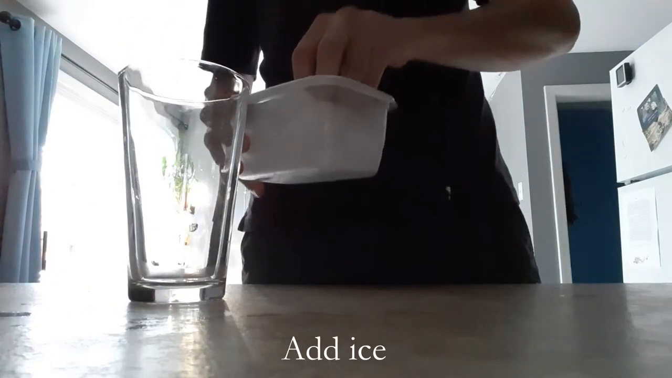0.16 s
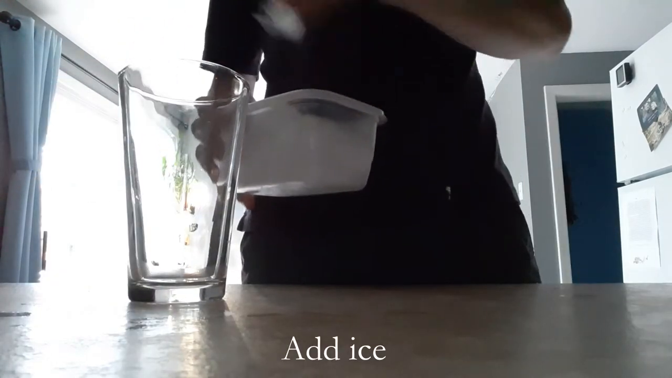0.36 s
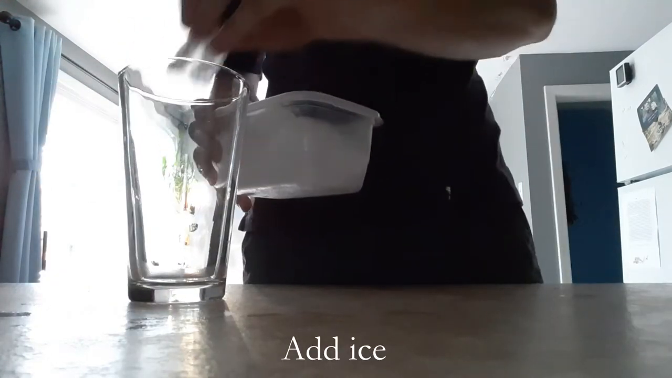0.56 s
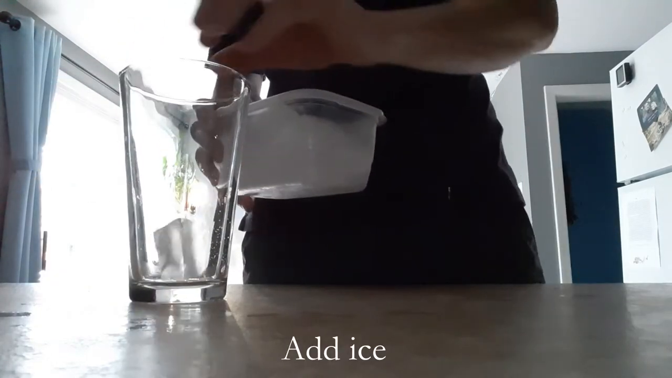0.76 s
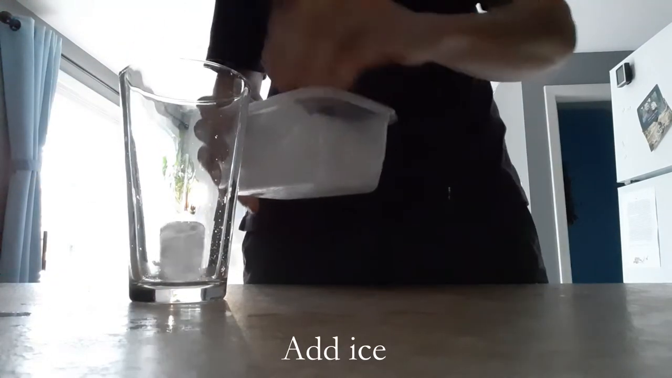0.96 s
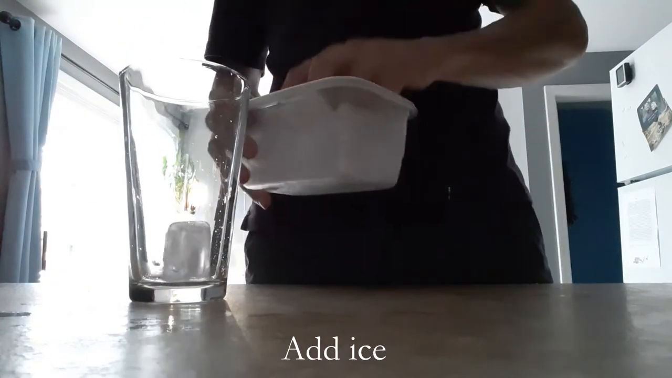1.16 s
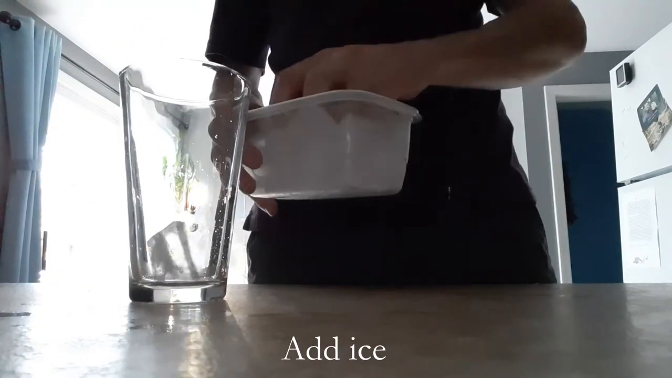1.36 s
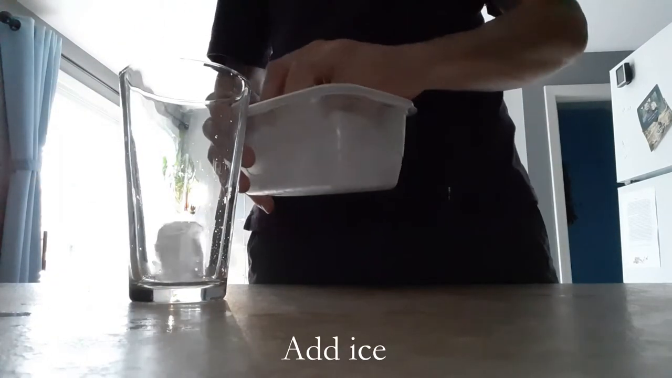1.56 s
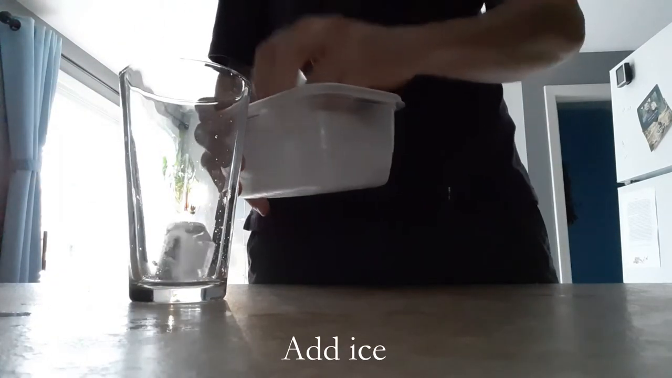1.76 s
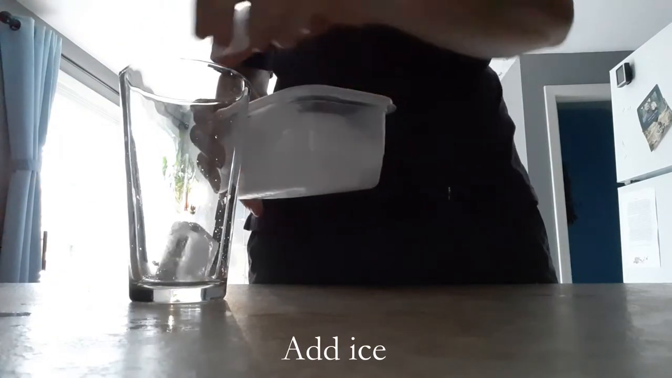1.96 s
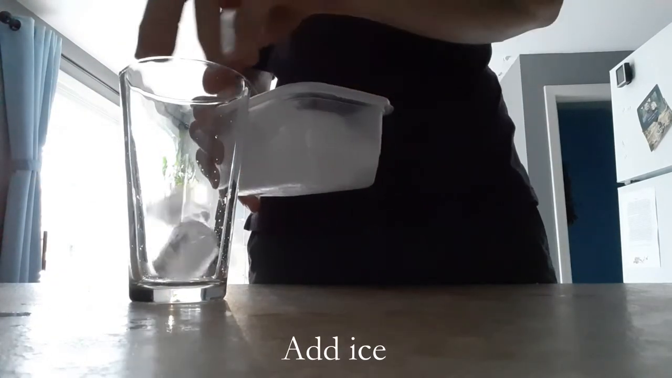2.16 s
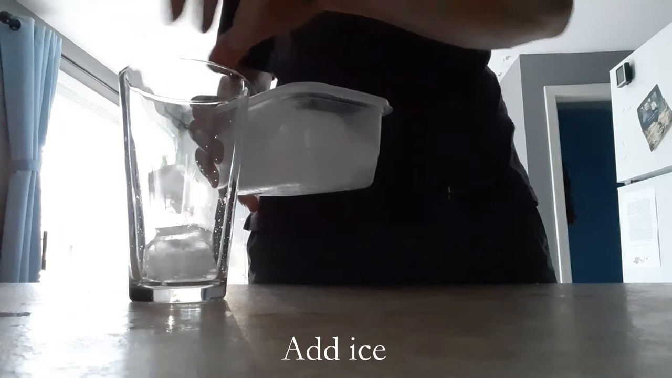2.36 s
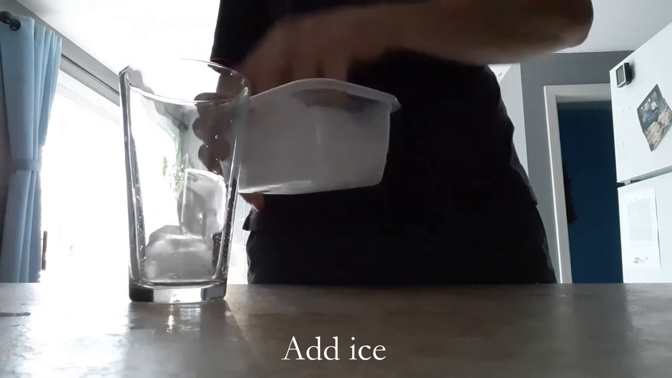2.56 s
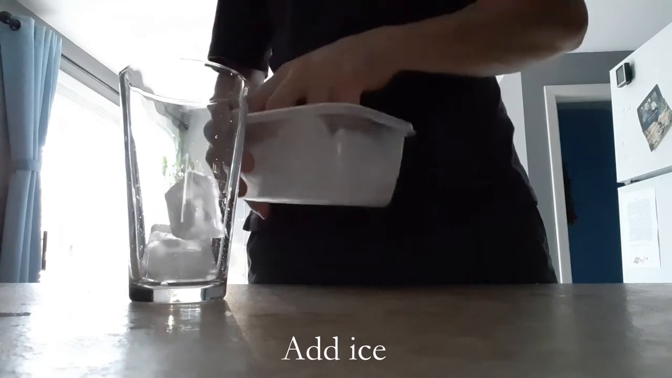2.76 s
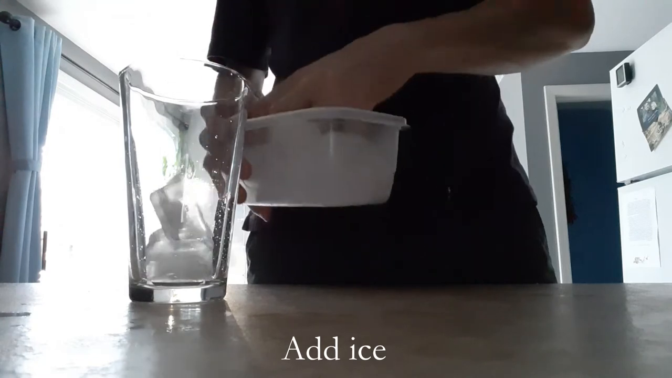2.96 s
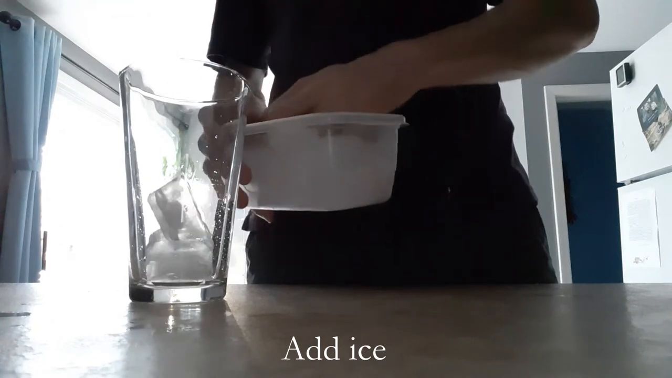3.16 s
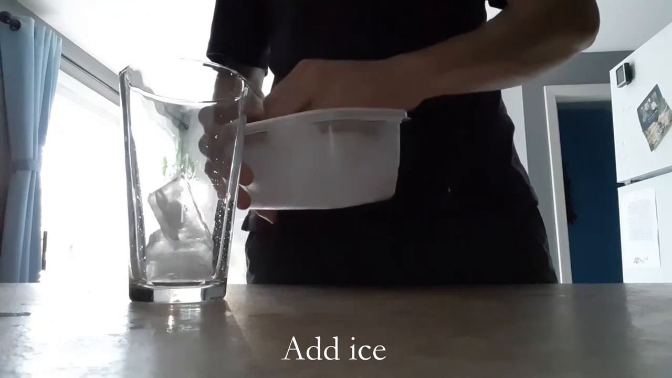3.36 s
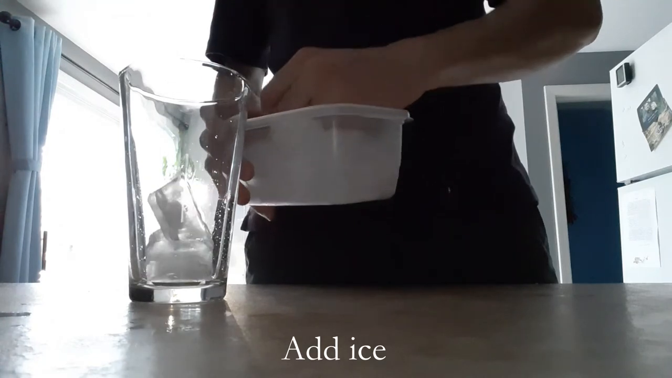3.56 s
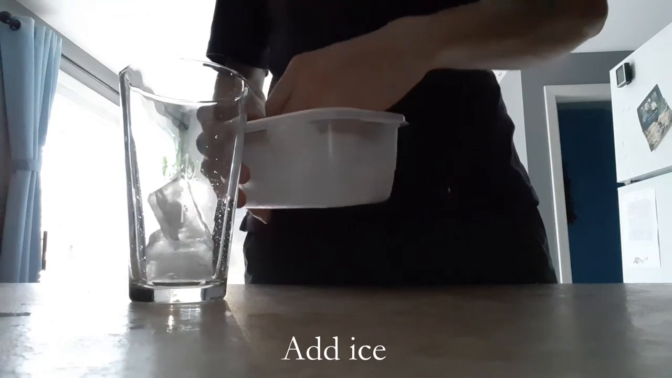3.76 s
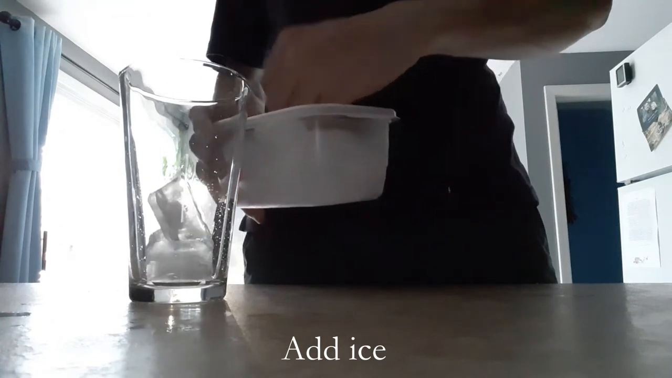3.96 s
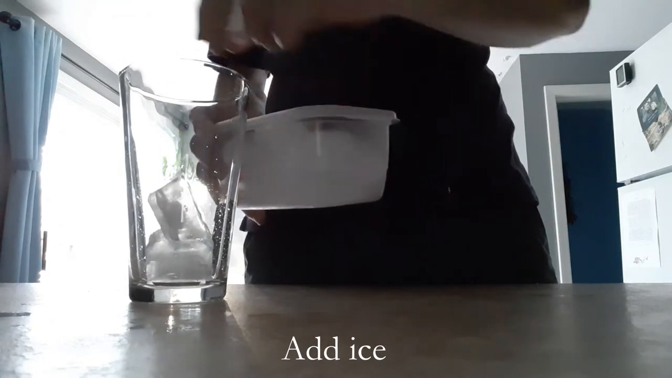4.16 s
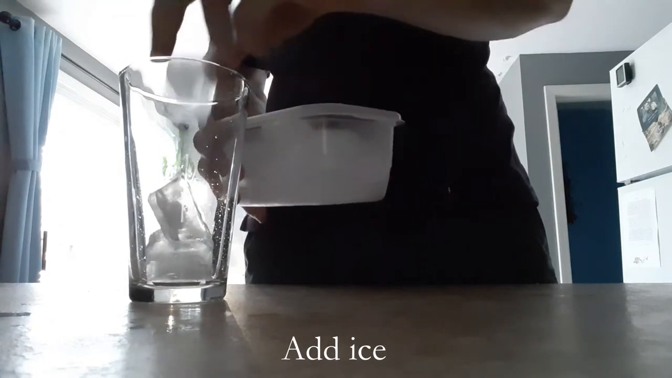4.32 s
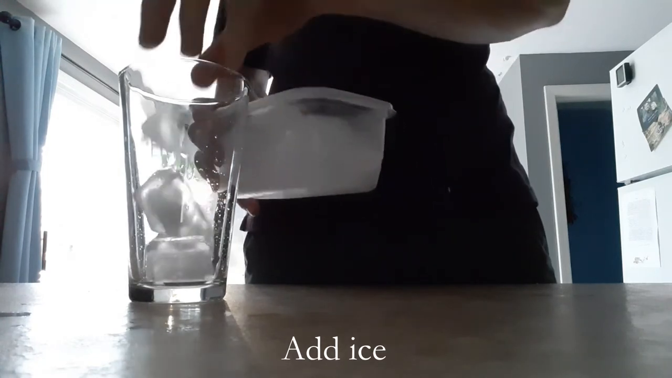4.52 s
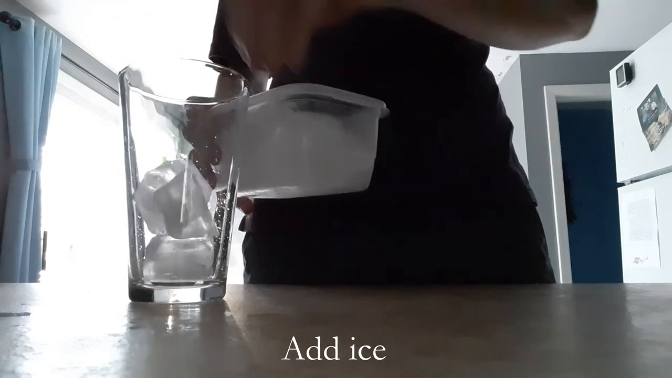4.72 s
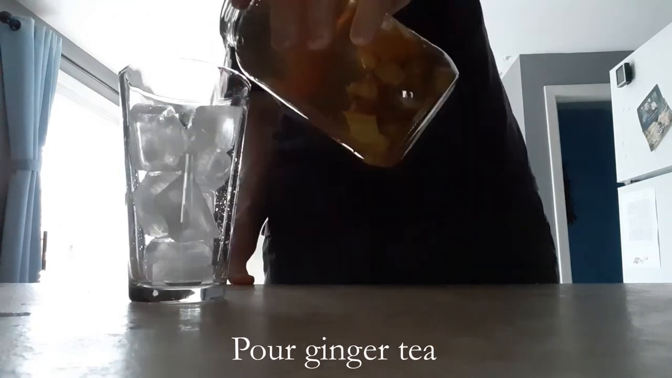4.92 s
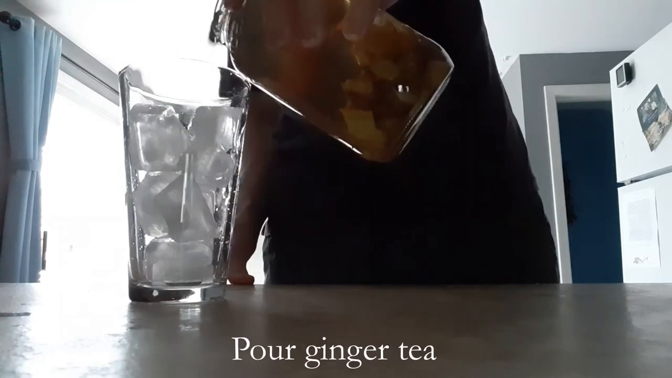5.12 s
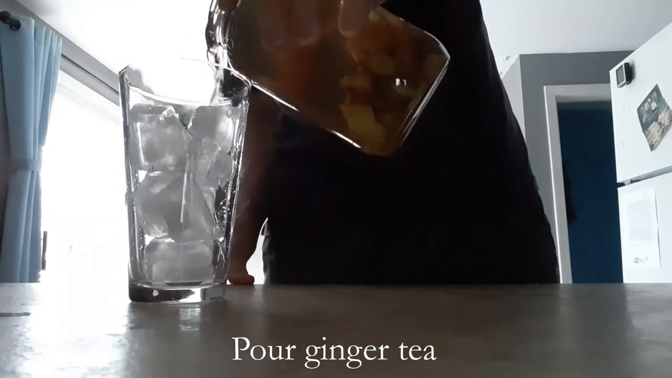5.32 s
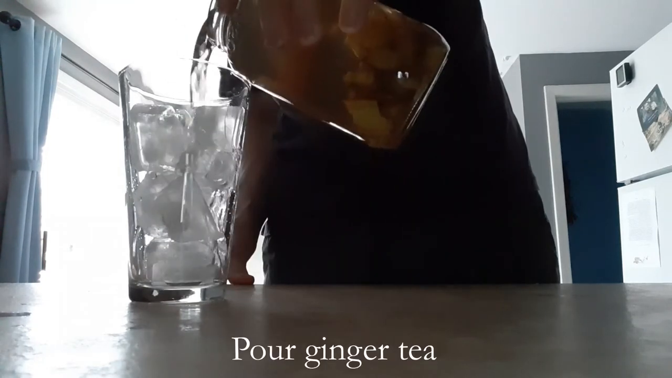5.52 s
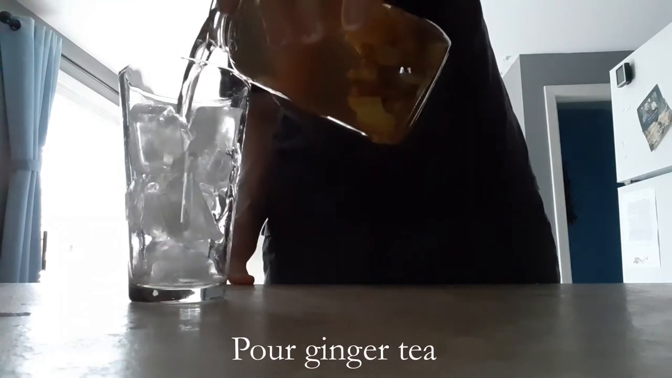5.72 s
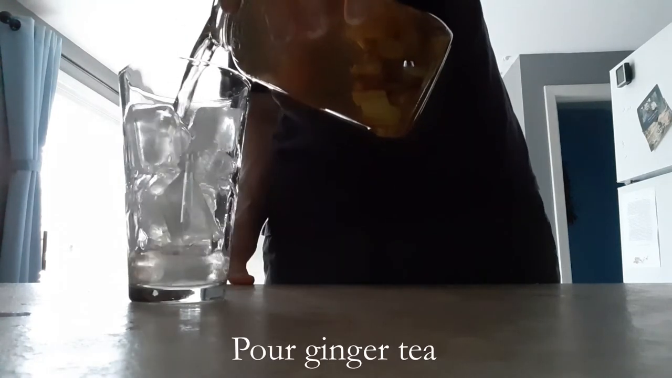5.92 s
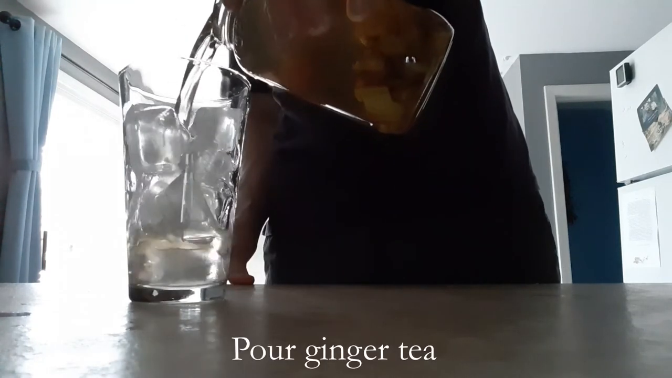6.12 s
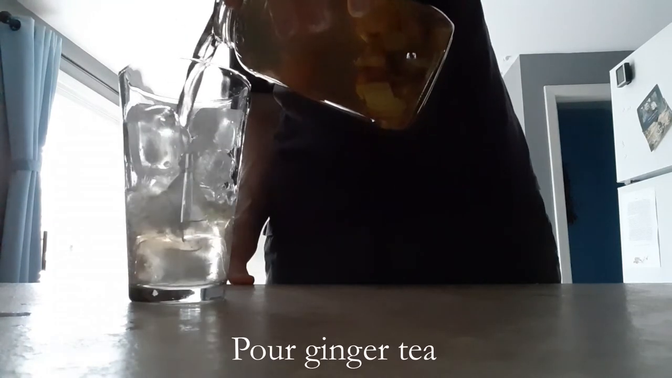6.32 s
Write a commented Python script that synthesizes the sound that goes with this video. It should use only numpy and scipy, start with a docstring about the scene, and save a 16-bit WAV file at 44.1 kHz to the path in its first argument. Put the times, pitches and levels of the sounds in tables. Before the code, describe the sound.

Ice cubes rattle in a plastic tub and ring brightly inside an empty glass, before an abrupt cut to a quiet, bubbly pour.

```python
"""A small kitchen in stereo, an appliance humming: filtered noise and a steady sine, under everything.
Fingers rummage in a plastic tub of ice (coloured click trains) and its cubes knock (noise bursts, pitches).
Three cubes drop one by one into a tall glass: ringing modes, ice cracks, and thuds through the base.
At a cut the tub is cut off and the background turns steady; then a dull knock on the counter,
and tea trickles over the ice: splash clicks and rising bubble tones. Near walls answer with noise tails."""
import sys
import numpy as np
from scipy import signal
from scipy.io import wavfile
from scipy.ndimage import uniform_filter1d

SR = 44100
rng = np.random.default_rng(int(sys.argv[2]) if len(sys.argv) > 2 else 0)


def wav_out(sig):
    """Save sig, one row per channel (or a flat mono array), as 16-bit PCM at SR to the path in sys.argv[1]."""
    wavfile.write(sys.argv[1], SR, np.round(np.clip(np.atleast_2d(sig).T, -1, 1) * 32767).astype(np.int16))


N = 281358
TIME = np.arange(N) / SR  # t/s
CUT_S = 4.917  # the tub and its reflections are cut off, the background changes to a steady level
EDGE_HZ = 16000  # upper band limit

# background level up to the cut, before the share of each layer: t/s, level/dB
BACKGROUND_LEVEL = [(0, -51.5), (.6, -51), (1.1, -60.5), (1.9, -64.5), (2.8, -61.5), (3.7, -66),
                    (4.3, -59.5), (4.9, -62.5)]
# colour of the room tone: f/Hz, relative level/dB
ROOM_TONE_COLOUR = [(15, -65), (25, -55.5), (84, -12.5), (108, -14), (200, -18.5), (326, -11.5), (363, -3),
                    (394, -6.5), (695, -22), (16000, -53.5)]
# colour of the appliance's whirr: f/Hz, relative level/dB
WHIRR_COLOUR = [(15, -55), (25, -39.5), (134, -11.5), (516, -10.5), (695, -25), (818, -13.5), (988, -29),
                (1520, -22.5), (2910, -41.5), (5570, -31), (16000, -59.5)]
# fingers searching the tub: start t/s, end t/s, relative level/dB
DIGS = [(0, .33, -39.5), (0.986, 1.696, -45.5), (2.578, 3.524, -44), (3.513, 4.03, -57)]
# a cube dragged over the others: peak t/s, relative level/dB, length/s, scratch relative to body/dB
SCRAPES = [(0.038, -25, 0.16, -4), (0.23, -31.5, 0.22, -7.5), (1.007, -32, 0.096, -12.5),
           (1.138, -29, 0.24, -5), (1.31, -38.5, 0.49, -3.5), (1.645, -32, 0.08, -2.5),
           (2.609, -22, .14, -5.5), (2.678, -33, 0.092, 9), (2.969, -30, 0.052, -9),
           (3.272, -37, 0.079, 12), (3.407, -30.5, 0.062, -0.5), (3.873, -35, 0.18, -2.5),
           (4.884, -28.5, 0.072, -3)]
# cubes knocking in the tub: t/s, relative level/dB, extra treble level/dB
TUB_KNOCKS = [(0.015, -21.5, -6), (0.212, -33, -7.5), (.307, -43, 4), (0.988, -43, 1.5), (1.105, -26, -7.5),
              (1.148, -36.5, 3), (1.193, -31, -5.5), (1.267, -36.5, 2.5), (1.386, -34.5, -8),
              (1.508, -47, 6), (1.652, -31, -6.5), (2.654, -27, -22), (2.704, -27, -1.5),
              (2.952, -32.5, -13), (2.983, -29, -3), (3.087, -39, 0.5), (3.131, -41, 0.5),
              (3.186, -37.5, 3), (3.237, -32.5, -8), (3.26, -28, -21), (3.275, -22, -12.5),
              (3.34, -36, -5.5), (3.55, -41.5, -1.5), (3.784, -33.5, -15), (3.889, -32.5, -3),
              (3.904, -36.5, -8), (4.867, -36.5, -13)]
# colour of the tub: f/Hz, relative level/dB
TUB_COLOUR = [(59, -47), (100, -16), (365, -10), (406, -1.5), (721, -5), (836, 3), (950, -10), (1610, 0.5),
              (2080, -7), (2370, -8), (9020, -26.5), (15000, -32), (16000, -17)]
# decay of the room reflections: f/Hz, time to fall 60 dB/s
ROOM_T60 = [(120, 0.99), (400, .42), (1500, 0.27), (4000, 0.37), (9000, 0.15), (16000, 0.27)]
# likeness of the reflections at the two microphones: f/Hz, likeness (0 unrelated to 1 same)
ROOM_LIKENESS = [(100, 1), (350, 0.95), (700, 1), (1500, 1), (16000, 0.071)]
# each cube is let go: t/s
CUBE_DROPS = [.6, 2.1, 4.4]
# ice against the glass wall: t/s, relative ring level/dB, hardness/(dB per octave),
# height on the wall (0 base to 1 rim), relative level of the ice crack/dB
CLINKS = [(.648, -8.5, -7.5, 0.65, -27), (0.687, -23, -1.5, 0.56, -30), (0.7, -20.5, 3, 0.011, -25.5),
          (.717, -15.5, 3, 0.095, -17), (0.792, -19, -3, 0.15, -22.5), (2.154, -44, 5, 0.18, -34),
          (2.219, -19, 0.5, .33, -16), (2.29, -16, 0.5, 0.23, -16), (2.377, -27, 4.5, 1, -38),
          (2.38, -6.5, -5, 0.81, -19), (2.404, -7, -2.5, 0.5, -14), (2.421, -12, -2.5, 0.45, -11.5),
          (2.452, -21, 3, 0.58, -43), (2.506, -21, -0.5, 0.42, -22.5), (2.624, -29, 1, 0.99, -23.5),
          (4.415, -17, 5, 0.87, -24), (4.429, -18.5, 0, 0.55, -13.5), (4.437, -15, 1.5, .87, -17),
          (4.479, -30.5, 2.5, 0.92, -28.5), (4.55, -10.5, -2, .95, -25), (4.56, -22, 3.5, 1, -19),
          (4.633, -45, 8, 0.91, -26.5), (4.645, -22, 1.5, .7, -22.5), (4.659, -33, 2, 1, -35),
          (5.203, -59, 0, .4, -43), (5.256, -64, 5, 0.96, -43)]
# modes of the glass: f/Hz, 60 dB decay before damping/s, level within its family/dB,
# left minus right level/dB, phase lead of left/rad
GLASS_MODES = [(1945, .55, 0, 2, .6), (1912, .2, -15, 0, .6), (4413, .26, 0, -5, -1.5),
               (3045, .2, -13, -2, 2), (5628, .18, -2, -6, 2.1), (5690, .15, -7, -4, 1.2),
               (5480, .1, -11, -4, 0), (2868, .2, -8, -2, -1.3), (8172, .19, 0, 7, -.8),
               (7708, .12, -14, 0, -.5), (10605, .22, -8, 3, -1.3), (11401, .18, -3, 5, -.1),
               (11929, .15, -9, 6, -.2), (12370, .17, -5, -4, 1.8), (15202, .2, -3, 14, -.6),
               (15706, .15, -4, 3, -1)]
# family of each glass mode: index of its row in FAMILY_SWING
MODE_FAMILY = [0, 0, 1, 2, 2, 2, 2, 3, 3, 3, 4, 4, 4, 4, 5, 5]
# how far each family swings by height struck (the upper wall is a node of the third family):
# base level/dB, lower wall level/dB, upper wall level/dB, rim level/dB
FAMILY_SWING = [(5.5, -2.5, 1, -4.5), (-26, -20, -7, 0.5), (-25.5, 4, -16, -2.5), (-36.5, -19, -20, -10),
                (-18.5, -16, -17, -21.5), (-8, -33, -27, -36.5)]
# colour of the ice crack: f/Hz, relative level/dB
CRACK_COLOUR = [(50, -37), (250, -20.5), (500, -11.5), (1050, -11.5), (1600, 5), (2300, 2), (3300, -4.5),
                (4700, -7), (5700, -1.5), (7000, -8), (9400, -24), (12300, -16.5), (16000, -26.5)]
# blows that pass through the base into the counter: t/s, relative level/dB
THUDS = [(0.695, -12), (0.701, -13.5), (0.717, -15.5), (0.779, -18), (0.796, -20.5), (2.152, -12),
         (2.207, -26.5), (2.218, -18), (2.29, -16.5), (2.4, -17), (2.44, -22.5), (4.415, -28), (4.429, -20),
         (4.479, -23), (4.535, -25.5), (4.562, -20.5), (4.635, -26), (4.659, -30.5), (4.683, -30.5),
         (5.201, -16)]
# modes of the glass standing on the counter, before detuning: f/Hz, 60 dB decay/s, relative level/dB
COUNTER_MODES = [(138, 0.45, -26), (184.5, 0.13, -7), (222.8, 0.12, -8.5), (310, 0.01, -11),
                 (437.2, 0.057, 3), (461.4, 0.2, -5.5), (605, 0.0083, -31.5), (658, 0.11, -4.5),
                 (747.3, 0.087, -0.5), (1230, 0.06, -17), (2330, .06, -10.5), (2480, 0.07, -18.5)]
# flow of the pour: t/s, splash level before the share of each layer/dB
POUR_LEVEL = [(5.44, -39.5), (5.54, -50.5), (5.66, -48), (6.0, -50.5), (6.38, -55)]
# colour of the splash: f/Hz, relative level/dB
SPLASH_COLOUR = [(500, 10.5), (1000, -3), (1800, 19.5), (2800, -2), (3600, 1), (5500, 4.5), (9000, -2),
                 (12500, 0.5), (16000, 3.5)]
# the largest bubbles in the pour: t/s, relative level/dB, starting f/Hz
LARGE_BUBBLES = [(5.801, -23, 1660), (5.853, -31, 1780), (5.946, -37, 1280), (5.964, -30, 1710),
                 (6.248, -29, 1230), (6.143, -33, 1640), (6.358, -34.5, 1577)]


def amp(db):
    """Decibels to gain."""
    return 10 ** (np.asarray(db) / 20)


def unit(x):
    """Scales to rms 1."""
    return x / np.sqrt(np.mean(x ** 2) + 1e-20)


def attack_unit(x, size=353):
    """Scales so that the first 8 ms have rms 1."""
    return x / np.sqrt(np.mean(x[..., :size] ** 2) + 1e-20)


def read(points, hz):
    """Reads a table on a log-frequency axis."""
    f, value = np.transpose(points)
    return np.interp(np.log(hz + 1), np.log(f), value)


def curve(rows, column):
    """A column of a table of times, joined by straight lines."""
    rows = np.array(rows)
    return np.interp(TIME, rows[:, 0], rows[:, column])


def add(mix, s, sound):
    """Adds a sound into the mix at time s."""
    part = mix[..., max(round(s * SR), 0):][..., :sound.shape[-1]]
    part += sound[..., :part.shape[-1]]


def colour(x, points, size=2048):
    """Minimum-phase, causal filter with the given spectrum."""
    hz = abs(np.fft.fftfreq(size, 1 / SR))
    log_gain = np.log(amp(np.maximum(read(points, hz), -100)))
    taps = np.fft.ifft(np.exp(signal.hilbert(log_gain).conj())).real
    return signal.fftconvolve(x, taps[None], axes=1)[:, :x.shape[1]]


def band(x, lo_hz, hi_hz):
    """Band-pass, kept below half the sample rate."""
    edges = [lo_hz, min(hi_hz, .49 * SR)]
    return signal.sosfilt(signal.butter(3, edges, "band", fs=SR, output="sos"), x)


def microphones(x, same, size=4):
    """Two unrelated signals become a partly alike pair; the right microphone hears it size samples late."""
    same = np.clip(same, 0, 1)
    right = same * x[0] + np.sqrt(1 - same ** 2) * x[1]
    return np.array([x[0], np.pad(right, (size, 0))[:len(right)]])


def flutter(size):
    """Smooth random signal of rms 1 that changes every size samples or so."""
    smooth = uniform_filter1d(rng.standard_normal(N), size)
    return unit(uniform_filter1d(smooth, size))


def burst(t60, after_db, after_t60, same, size=6000):
    """A contact: noise with a sharp decay, then the weaker chatter of the cube settling."""
    t = np.arange(size) / SR
    noise = microphones(rng.standard_normal((2, size)), same)
    return noise * (amp(-60 * t / t60) + amp(after_db - 60 * t / after_t60))


def grains(per_s, spread_db):
    """A train of tiny clicks at random times, their sizes spread by spread_db."""
    size = amp(spread_db * np.minimum(rng.exponential(1, N), 4))
    signed = size * rng.choice([-1, 1], (2, N))
    return unit(signed * (rng.random(N) < per_s / SR))


def background(hum_hz=120.0, hum_db=-3, air_db=-2, whirr_db=-3, pour_air_db=-68, pour_whirr_db=-53.0):
    """Soft room tone as noise, an appliance as noise plus a sine; both change to a steady level at the cut."""
    def steady_noise(points):
        """Coloured noise, much alike at both microphones."""
        return unit(colour(microphones(rng.standard_normal((2, N)), 0.77), points))

    air, whirr = steady_noise(ROOM_TONE_COLOUR), steady_noise(WHIRR_COLOUR)
    hum = np.sqrt(2) * np.sin(2 * np.pi * hum_hz * TIME)
    appliance = whirr + amp(hum_db) * hum
    level, after_cut = curve(BACKGROUND_LEVEL, 1), TIME > CUT_S
    air_level = np.where(after_cut, pour_air_db, level + air_db)
    appliance_level = np.where(after_cut, pour_whirr_db, level + whirr_db)
    return amp(air_level) * air + amp(appliance_level) * appliance


def tub_rummage(body_db=-5, scratch_db=-4, clump_db=3, ticks_db=-5):
    """Frosty faces stick and slip under digging fingers: clumps of clicks, with scrapes and random ticks."""
    dig_fade_s, dig_scratch_db = .03, -10
    scrape_rise, scrape_fall_db = 0.5, 24.5  # rise as a share of the length; drop over one length
    digging = np.zeros(N)
    for start, end, db in DIGS:
        nearest_end = np.minimum(TIME - start, end - TIME)
        digging += amp(db) * np.clip(nearest_end / dig_fade_s, 0, 1)

    # each scrape swells and fades over the steady rubbing
    body, scratch = digging, digging * amp(dig_scratch_db)
    for s, db, length, treble_db in SCRAPES:
        away = np.maximum((s - TIME) / scrape_rise, TIME - s) / length
        stroke = amp(db - scrape_fall_db * away) * np.clip(2 - away, 0, 1)
        body = np.maximum(body, stroke)
        scratch = np.maximum(scratch, stroke * amp(treble_db))

    clicks = microphones(grains(per_s=1000, spread_db=0.0), 0.43)
    slips = colour(clicks * amp(clump_db * flutter(size=400)), TUB_COLOUR)
    ticks = np.tile(grains(per_s=51, spread_db=-0.5)[0], (2, 1))
    contact = burst(t60=.02, after_db=-22, after_t60=.05, same=0.071)
    ticks = colour(signal.oaconvolve(ticks, contact, axes=1)[:, :N], TUB_COLOUR)

    out = unit(band(slips, 210, 2600)) * body * amp(body_db)
    out += unit(band(slips, 4300, 24000)) * scratch * amp(scratch_db)
    return out + unit(band(ticks, 900, 12000)) * digging * amp(ticks_db)


def tub_knocks(low_db=-7, middle_db=3.5, high_db=6.0):
    """Cubes knock each other and the dead plastic wall: a coloured burst plus brief pitches, in three bands."""
    out = np.zeros((2, N))
    for s, db, treble_db in TUB_KNOCKS:
        contact = burst(t60=0.033, after_db=-27.5, after_t60=0.07, same=0.17)
        hit = attack_unit(colour(contact, TUB_COLOUR))
        # each knock adds three brief random pitches
        t = TIME[:hit.shape[1]]
        pitches = np.sin(2 * np.pi * rng.uniform(1000, 2800, (3, 1)) * t).sum(0)
        hit = hit + amp(-1 - 60 * t / 0.025) * pitches
        bands = ((low_db, 170, 1000), (middle_db, 1000, 3000), (high_db + treble_db, 3000, 17000))
        for band_db, lo_hz, hi_hz in bands:
            add(out, s, amp(db + band_db) * attack_unit(band(hit, lo_hz, hi_hz)))
    return out


def kitchen(x, size=26000):
    """Dense reflections from near walls: each band dies at its own speed, the bass alike at both microphones."""
    hz, t, z = signal.stft(rng.standard_normal((2, size)), SR, nperseg=256)
    same = np.clip(read(ROOM_LIKENESS, hz), 0, 1)[:, None]
    z[0] = same * z[1] + np.sqrt(1 - same ** 2) * z[0]
    decay = amp(-60 * t / read(ROOM_T60, hz)[:, None])
    tail = signal.istft(z * decay, SR, nperseg=256)[1][:, :size]
    tail *= np.clip((TIME[:size] - .003) / 0.0017, 0, 1)  # reflections begin after 3 ms
    return signal.fftconvolve(x, tail / np.linalg.norm(tail[0]), axes=1)[:, :N]


def glass_ring(rise_s=0.0016, hold_s=.05, sustain=0.86, damping_db_per_s=28, spot_db=1,
               turn_db=2, turn_rad=.35, slip_rad=0.37, shimmer=0.16, twin_db=-14, split=0.0035):
    """Each contact gives every wall mode a new swing, which dies until the next; height and hardness weight it."""
    times, ring_db, hardness, height, _ = np.transpose(CLINKS)
    out = np.zeros((2, N))
    last = np.maximum(np.searchsorted(np.sort(times), TIME, "right") - 1, 0)
    age = abs(TIME - times[last])
    struck = TIME >= times[0]
    young = np.exp(-age / hold_s)
    # each cube after the first that leans on the wall makes the ring die faster
    extra_cubes = np.maximum(np.searchsorted(CUBE_DROPS, TIME) - 1, 0)
    trembles = young * np.array([flutter(size=110) + 1j * flutter(size=110) for _ in range(2)])
    pole = np.exp(-1 / (rise_s * SR))
    reference_hz = GLASS_MODES[0][0]  # for hardness and shimmer

    for (hz, t60, db, side_db, lead), family in zip(GLASS_MODES, MODE_FAMILY):
        spot, jolt, facing = rng.standard_normal((len(times), 3)).T
        swing_db = FAMILY_SWING[family]
        shape_db = np.interp(height, np.linspace(0, 1, len(swing_db)), swing_db)
        hardness_db = hardness * np.log2(hz / reference_hz)
        level = ring_db + db + shape_db + hardness_db + spot_db * spot

        # each contact turns the pattern of the mode a little towards one microphone or the other
        turn = amp(turn_db * facing) * np.exp(1j * turn_rad * facing)
        turn = turn ** np.array([[.5], [-.5]])
        pair = unit(amp([side_db / 2, -side_db / 2])) * np.exp([1j * lead, 0])
        phase = np.exp(1j * np.cumsum(slip_rad * jolt))
        start = pair[:, None] * turn * amp(level) * phase
        loss_db_per_s = 60 / (t60 * sustain) + damping_db_per_s * extra_cubes
        fade = amp(-loss_db_per_s * age) * struck

        # the glass is not quite round: each mode has a twin that beats against it
        twin_phase = split * hz * age + rng.random(len(times))[last]
        beat = 1 + amp(twin_db) * np.sqrt(young) * np.exp(2j * np.pi * twin_phase)
        # the swing takes a moment to spread round the wall
        swing = signal.lfilter([1 - pole], [1, -pole], start[:, last] * (fade * beat) + 1e-18)
        # a cube that still touches the wall makes the young ring tremble, the high modes most
        depth = shimmer * np.sqrt(hz / reference_hz)
        tremble = 1 + depth * np.exp(2j * np.pi * rng.random()) * trembles
        out += np.sqrt(2) * (swing * tremble * np.exp(2j * np.pi * hz * TIME)).real
    return out


def ice_cracks():
    """The hard, brief click of the ice itself at every clink: a coloured noise burst."""
    out = np.zeros((2, N))
    for s, *_, db in CLINKS:
        contact = burst(t60=0.014, after_db=-14.0, after_t60=0.04, same=0.25)
        add(out, s, amp(db) * attack_unit(colour(contact, CRACK_COLOUR)))
    return out


def thuds(detune=0.06, scatter_db=-9, lead_rad_per_hz=0.002):
    """The base pushes on the counter: a few low, short modes, and a noise burst for the denser ones."""
    out, t = np.zeros((2, N)), np.arange(9000) / SR
    for s, db in THUDS:
        shifts = 1 + detune * rng.standard_normal(len(COUNTER_MODES))
        ring = np.zeros((2, len(t)))
        for k, ((hz, t60, mode_db), shift) in enumerate(zip(COUNTER_MODES, shifts)):
            # the higher the mode, the more its phase differs between the two microphones
            lead = lead_rad_per_hz * hz * np.array([[.5], [-.5]])
            sign = (-1) ** (k // 2)
            ring += sign * amp(mode_db - 60 * t / t60) * np.sin(2 * np.pi * hz * shift * t + lead)
        add(out, s, amp(db) * attack_unit(band(ring, 140, 2600)))
        scatter = burst(t60=0.05, after_db=-12.5, after_t60=0.14, same=0.58)
        add(out, s, amp(db + scatter_db) * attack_unit(band(scatter, 140, 1000)))
    return out


def bubble(hz, t60, glide, size=5000):
    """A trapped pocket of air rings, rising in pitch as it nears the surface."""
    t = np.arange(size) / SR
    pitch = hz * (1 + glide * np.minimum(t / t60, 1))
    envelope = amp(-60 * t / t60) * (1 - np.exp(-t * hz / 2))
    return np.sin(2 * np.pi * np.cumsum(pitch) / SR) * envelope


def bubble_swarm(lo_hz, hi_hz, per_s, cycles, cluster_db=7, count=24):
    """Small bubbles of many sizes, born in clusters; 60 dB decay lasts cycles periods of the starting pitch."""
    first = round(CUT_S * SR)
    out = np.zeros((2, N - first))
    crowd = unit(amp(cluster_db * flutter(size=1100)[first:]))
    for hz in np.geomspace(lo_hz, hi_hz, count):
        born = rng.random(len(crowd)) < crowd * per_s / count / SR
        births = born * rng.random(len(crowd)) ** 4
        ringing = signal.oaconvolve(births, bubble(hz, cycles / hz, 0.071))[:len(crowd)]
        out += rng.uniform(0.1, 1, (2, 1)) * ringing
    return np.pad(unit(microphones(out, 0.93)), ((0, 0), (first, 0)))


def pour(start_s=5.43, onset_s=0.016, splash_db=-1, fizz_db=-3, pips_db=0, gurgle_db=-48,
         hollow_db=-51, slap_db=-15, surge_db=4, bubble_t60=0.053):
    """Tea spatters on the ice as clicks, gurgles between cubes as bubbles, and rings the air in the glass."""
    flow = np.clip((TIME - start_s) / onset_s, 0, 1) * amp(curve(POUR_LEVEL, 1))
    filling = np.clip((TIME - start_s) / .5, 0, 1)
    # the stream starts smooth, then breaks into drops
    surge = unit(amp(surge_db * filling * flutter(size=700)))
    splash = unit(colour(microphones(grains(per_s=4500, spread_db=-1.5), 0.075), SPLASH_COLOUR))
    fizz = bubble_swarm(2483, 7870, per_s=1700, cycles=61)
    pips = bubble_swarm(4300, 7240, per_s=64, cycles=150)
    gurgle = bubble_swarm(750, 2450, per_s=1000, cycles=36)
    hollow = unit(band(microphones(grains(per_s=310, spread_db=8.5), 0.16), 624, 692))

    out = flow * surge * (amp(splash_db) * splash + amp(fizz_db) * fizz)
    out += flow * filling * amp(pips_db) * pips
    out += filling * (amp(gurgle_db) * gurgle + amp(hollow_db) * hollow)
    for s, db, hz in LARGE_BUBBLES:
        # a drop slaps the surface and drags a bubble under
        contact = burst(t60=0.035, after_db=-25, after_t60=0.066, same=0.35)
        add(out, s, amp(db + slap_db) * attack_unit(colour(contact, SPLASH_COLOUR)))
        ringing = np.tile(bubble(hz, bubble_t60, 0.32), (2, 1))
        add(out, s, amp(db) * microphones(ringing, 0.65))
    return out


def scene():
    """All sources, each with its own share of the room; the tub and its reflections are cut off at the cut."""
    tub = amp(-3.5) * tub_knocks() + tub_rummage()
    tub = tub + amp(-8) * kitchen(tub)
    tub = tub * np.clip((CUT_S - TIME) / 0.0037, 0, 1)
    ring = amp(0.24) * glass_ring()
    cracks = amp(-3.0) * ice_cracks()
    blows = amp(-2) * thuds()
    tea = pour()
    room_send = amp(-9.5) * ring + amp(-3.5) * cracks + amp(-13.0) * blows + amp(-11) * tea
    return background() + tub + ring + cracks + blows + tea + kitchen(room_send)


def record(dry):
    """Peaks stop at full scale; then a linear-phase low-pass sets the band limit."""
    taps = signal.firwin(511, EDGE_HZ, window=("kaiser", 9), fs=SR)
    return signal.oaconvolve(np.clip(dry, -1, 1), taps[None], "same")


dry = scene()
out = record(dry)
wav_out(out)
```